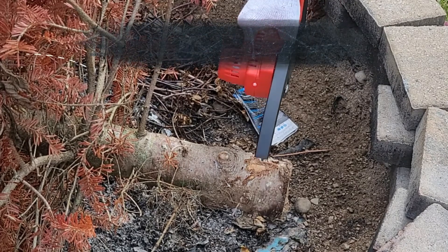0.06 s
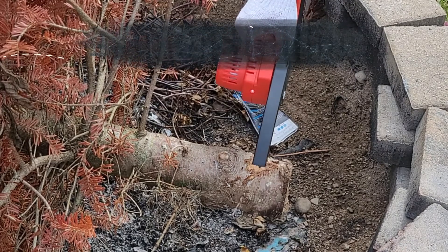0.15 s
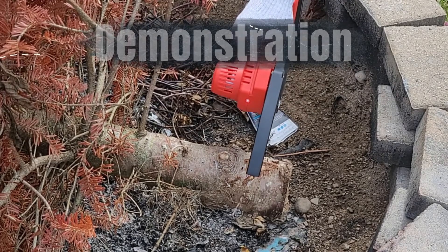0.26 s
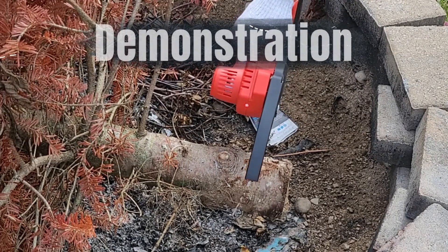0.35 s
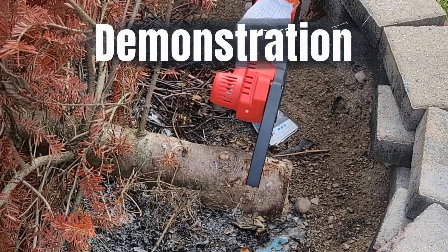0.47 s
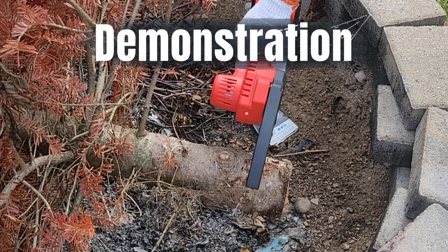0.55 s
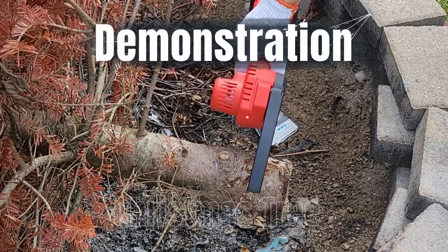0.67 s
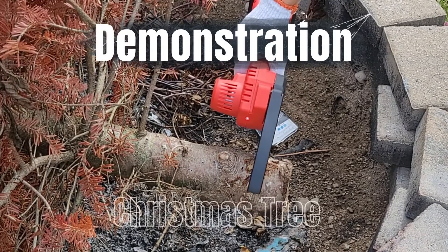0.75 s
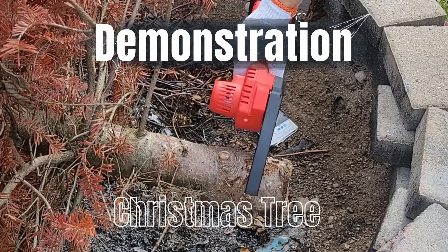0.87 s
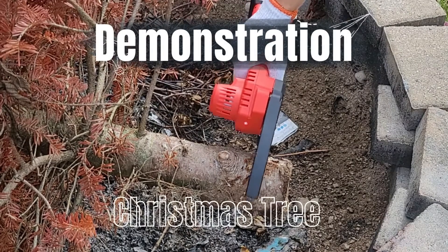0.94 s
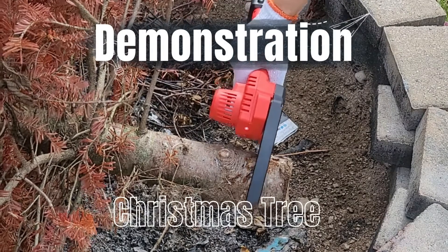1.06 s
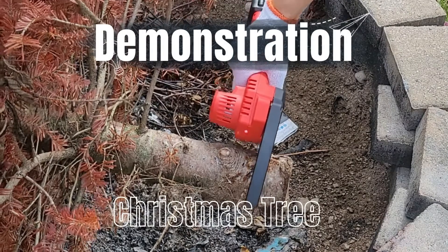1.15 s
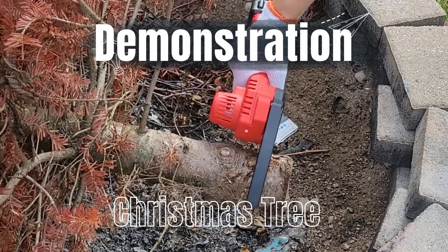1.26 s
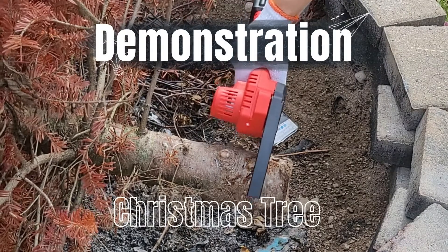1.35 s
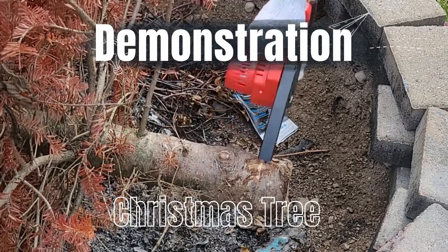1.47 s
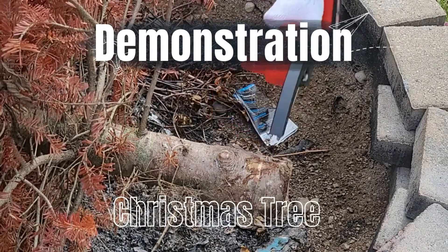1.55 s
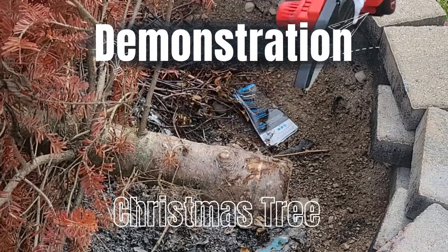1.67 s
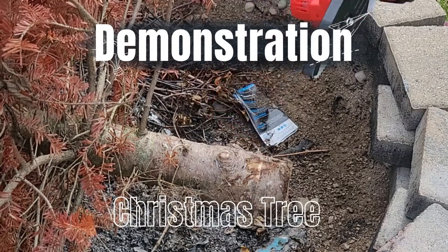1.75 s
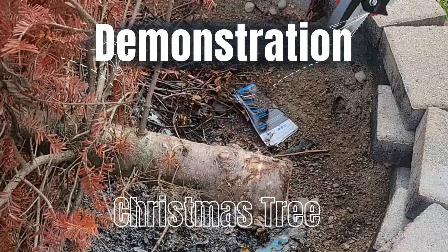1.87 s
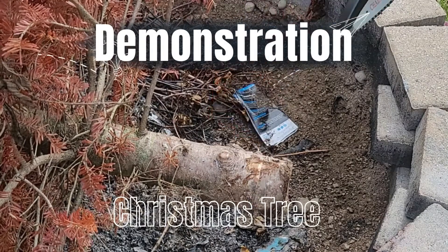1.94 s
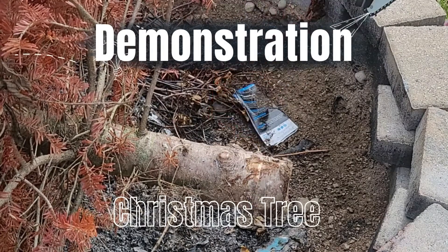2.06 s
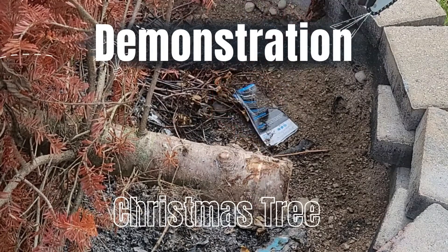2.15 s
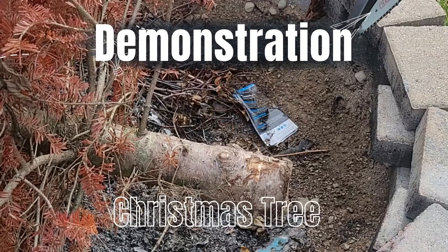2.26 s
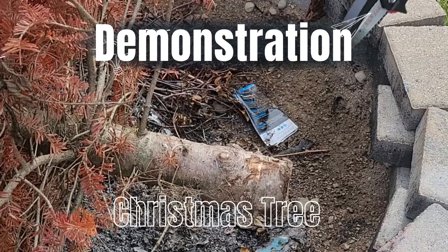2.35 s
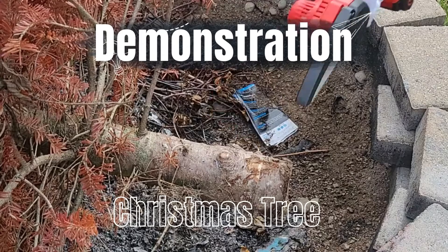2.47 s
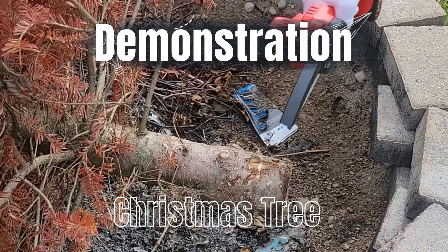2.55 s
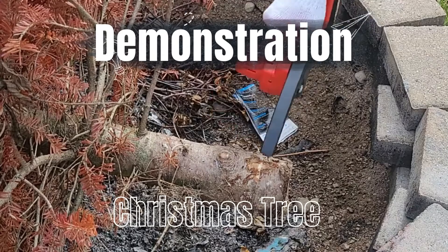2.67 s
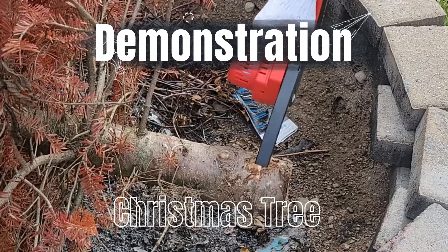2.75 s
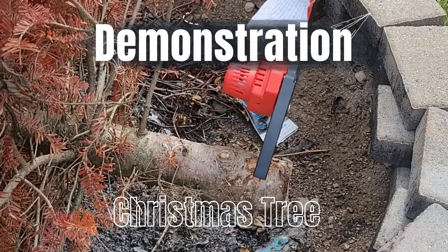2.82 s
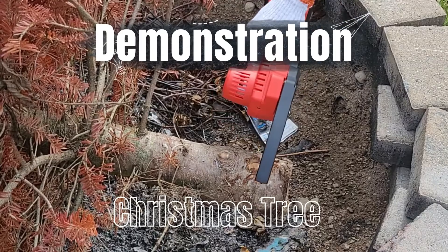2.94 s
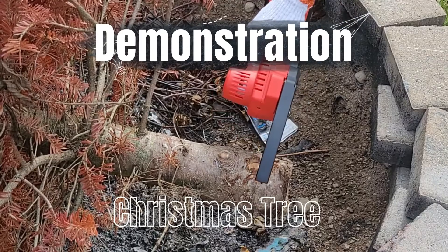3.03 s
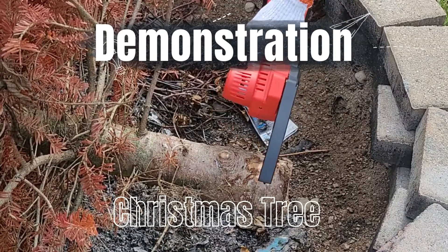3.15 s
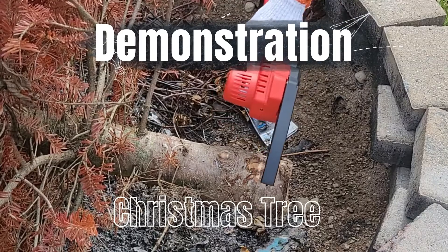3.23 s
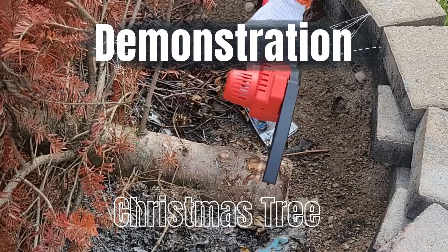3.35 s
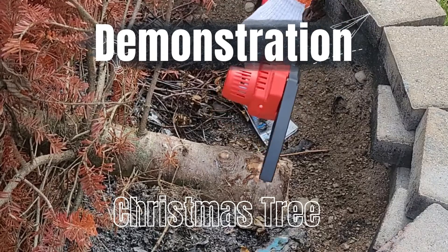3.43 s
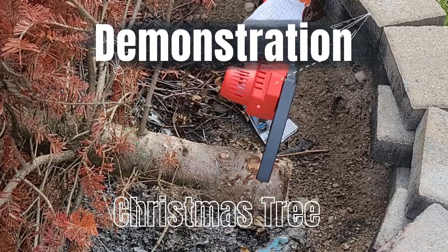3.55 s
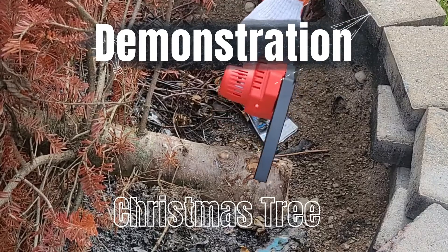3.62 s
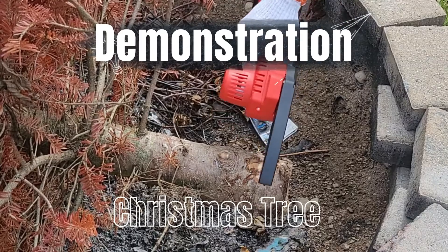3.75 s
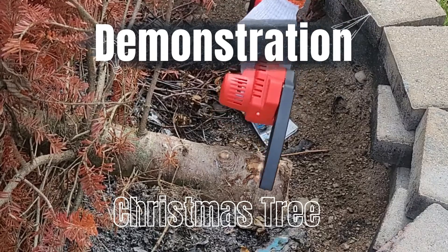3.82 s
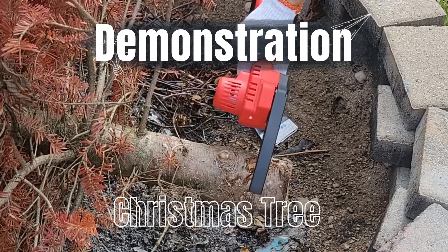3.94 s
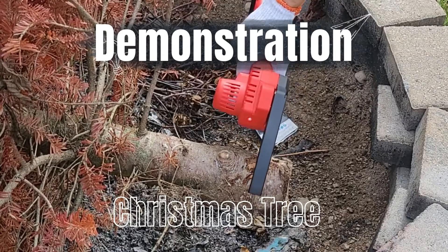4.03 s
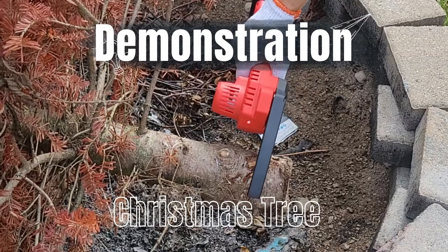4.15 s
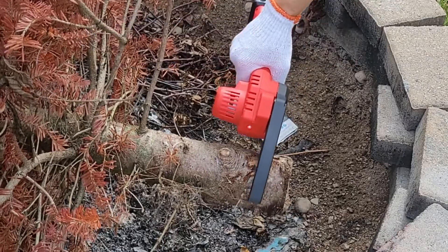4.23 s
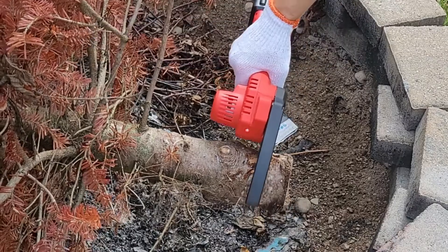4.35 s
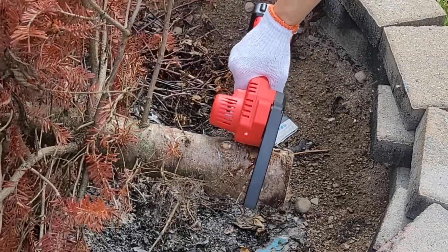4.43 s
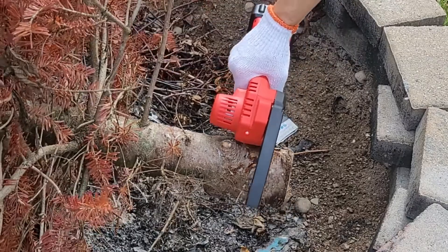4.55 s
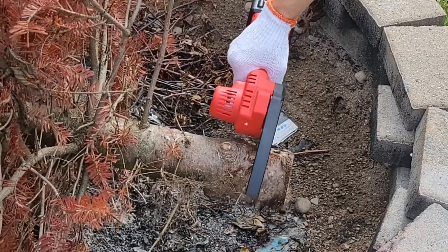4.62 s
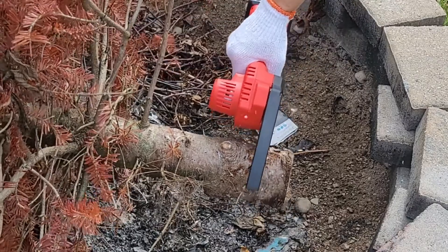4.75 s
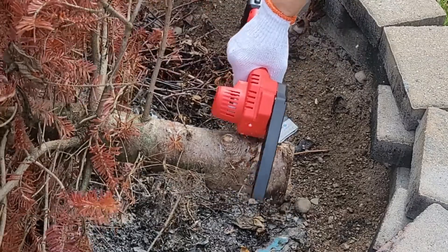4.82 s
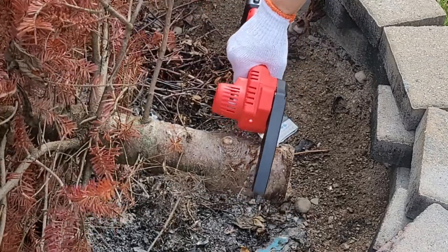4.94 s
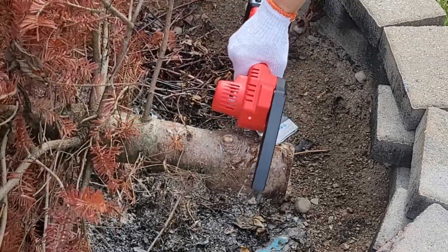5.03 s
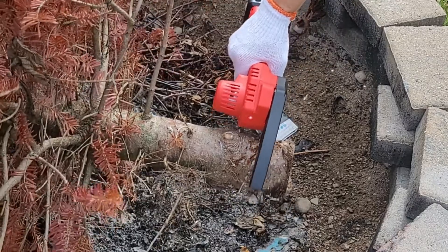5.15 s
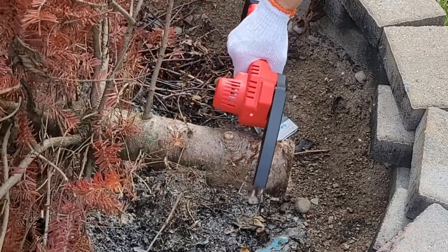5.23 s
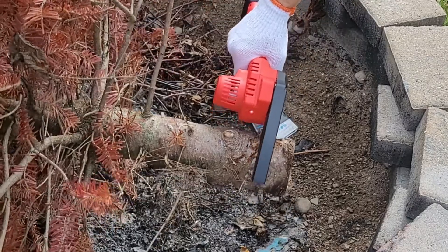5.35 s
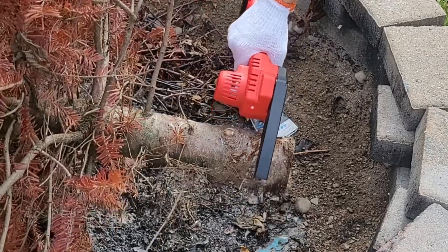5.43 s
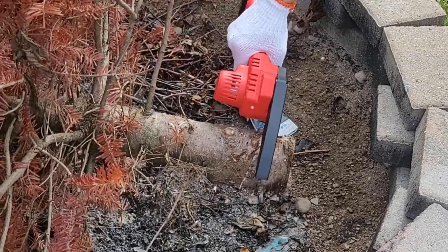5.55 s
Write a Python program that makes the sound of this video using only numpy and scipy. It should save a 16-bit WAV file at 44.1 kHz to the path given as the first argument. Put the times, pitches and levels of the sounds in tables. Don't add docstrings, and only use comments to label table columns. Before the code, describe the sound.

A loud, bright handheld chainsaw buzzes at full speed, dips slightly as it touches wood, then winds down in a fraction of a second. A soft garden pause reveals birds to the left, a high cricket to the right, low wind and small dry cracks. The motor snaps back on, then labours roughly through wood. Close, wide stereo pickup with only faint outdoor echo.

```python
import sys
import numpy as np
from scipy import signal
from scipy.fft import rfft, irfft
from scipy.io import wavfile

SR = 44100
rng = np.random.default_rng(int(sys.argv[2]) if len(sys.argv) > 2 else 0)


def field_ratio(decibels):
    return 10 ** (np.asarray(decibels, dtype=float) / 20)


def output_pcm(signal):
    pcm = np.clip(np.atleast_2d(signal).T, -1, 1) * 32767
    wavfile.write(sys.argv[1], SR, np.round(pcm).astype(np.int16))


N = 246519
T = np.arange(N) / SR
HZ = np.maximum(np.arange(N // 2 + 1) * SR / N, 1)
RELEASE_S, PRESS_S = 1.412, 3.572
STALL_HZ, FULL_HZ = 30, 454
# [pitch_hz, likeness_0_to_1]
CLOSE_LIKENESS = [(60, 0.79), (120, 0.93), (240, 0.53), (480, 1), (950, 0.94), (1890, 0.76), (3770, 0.91),
                  (7520, 0.38), (15000, 0.74)]


def rms_one(x):
    return x / np.sqrt(np.mean(x ** 2) + 1e-20)


def at_hz(points):
    hz, value = np.array(points)[:, 0], np.array(points)[:, 1]
    return np.interp(np.log(HZ), np.log(hz), value)


def drift(rate_hz):
    r = np.exp(-80 * np.pi * rate_hz / SR)
    noise = rng.standard_normal(N // 40 + 2002)
    slow = signal.lfilter([1], [1, -2 * r, r * r], noise)[2000:]
    return np.interp(np.arange(N) / 40, np.arange(len(slow)), rms_one(slow))


def ring(clicks, hz, t60_s):
    r, w = field_ratio(-60 / (t60_s * SR)), 2 * np.pi * hz / SR
    return signal.lfilter([0, np.sin(w)], [1, -2 * r * np.cos(w), r * r], clicks + 1e-18)


def body(modes, steep):
    power = 0
    for hz, width_hz, db in modes:
        off_center = (HZ - hz * hz / HZ) / width_hz
        power = power + field_ratio(2 * db) / (1 + off_center ** 2) ** steep
    return np.sqrt(power)


def two_ears(mid, side, gain, likeness, lean_db):
    alike = np.clip(at_hz(likeness), 0, 1)
    m = np.sqrt(1 + alike) * rfft(mid)
    s = np.sqrt(1 - alike) * rfft(side)
    ears = np.array([(m + s) * field_ratio(lean_db / 2), (m - s) * field_ratio(-lean_db / 2)])
    return rms_one(irfft(gain * ears, N))


def bandpass(x, low_hz, high_hz):
    return signal.sosfilt(signal.butter(3, [low_hz, high_hz], "band", fs=SR, output="sos"), x)


def highpass(x, hz):
    return signal.sosfilt(signal.butter(4, hz, "high", fs=SR, output="sos"), x)


def garden_air():
    # [pitch_hz, level_db_per_hz]
    air = [(15, -34.5), (25, -9.5), (59, 0.5), (91, -2.5), (136, -8), (178, -21), (260, -20.5), (1050, -35),
           (2770, -30), (4040, -31), (6730, -45), (7910, -49), (9300, -39), (15500, -50)]
    # [pitch_hz, likeness]
    air_likeness = [(60, 0.91), (240, 0.85), (950, 0.34), (3770, -0.04), (15000, 0.11)]
    # [center_s, half_length_s, rise_over_wind_db]
    gusts = [(0, 0.027, 6), (0.287, .06, 7), (.62, .08, 0), (1.28, .07, 3), (2.24, .07, 5), (2.6, .6, 4.5),
             (3.1, 0.092, 5), (3.42, .06, 4), (4.31, .07, 3), (4.57, 0.088, 7), (4.8, .15, 3)]
    # [center_s, half_length_s, level_db]
    rustles = [
        (1.83, .008, -76),
        (2.29, .08, -74),
        (2.42, .015, -72),
        (2.49, .08, -77),
        (2.55, .02, -74),
        (3.46, .03, -82),
        (3.585, .02, -79),
    ]
    gain = field_ratio(at_hz(air))
    wash = two_ears(*rng.standard_normal((2, N)), gain * (HZ > 140), air_likeness, 0)
    wind = two_ears(*rng.standard_normal((2, N)), gain * (HZ <= 140), air_likeness, 0)
    grains = (rng.random((2, N)) < 6000 / SR) * rng.standard_normal((2, N))
    needles = two_ears(*grains, body([(9200, 2500, 0.0052), (12420, 3500, 0)], 1.5), CLOSE_LIKENESS, 0)
    stir = sum(field_ratio(db - 17 * ((T - s) / half) ** 2) for s, half, db in rustles)
    gusts_db = sum(db * np.exp(-((T - s) / half) ** 2) for s, half, db in gusts)
    wash_db = -64 + 3 * np.minimum(stir / field_ratio(-72), 1) + 1.3 * drift(8)
    out = field_ratio(wash_db) * wash
    out = out + field_ratio(5 + 2 * drift(60)) * stir * needles
    far_birds = body([(2698, 200, 1), (3200, 250, -2), (4000, 400, -3.5)], 2)
    chatter = two_ears(*rng.standard_normal((2, N)), far_birds, air_likeness, 0)
    out = out + field_ratio(-75 + 4 * drift(6)) * chatter
    return out + field_ratio(-59 + gusts_db + 0.7 * drift(5)) * wind


def birds():
    # [start_s, length_s, start_hz, end_hz, level_db]
    glides = [(2.01, .087, 1900, 2130, -58.5), (2.443, .018, 3770, 4900, -61.5),
              (2.378, .02, 5300, 4600, -63), (2.766, .06, 2050, 3500, -57), (2.82, .028, 3500, 4300, -50.5),
              (2.838, .034, 1780, 2200, -57), (2.85, .04, 2600, 3200, -63), (2.872, .018, 5400, 3600, -54),
              (2.885, .035, 3780, 4400, -60), (2.888, .015, 2600, 3000, -60),
              (2.938, .035, 1750, 2100, -70), (2.945, .014, 3600, 2600, -63),
              (2.93, .025, 4100, 4400, -64.5), (3.003, .023, 3480, 4150, -65),
              (3.026, .023, 4150, 3600, -66), (3.135, .037, 3300, 4300, -68), (3.165, .04, 2180, 2500, -64),
              (3.205, .03, 2500, 1750, -63), (3.19, .012, 4800, 3600, -65), (3.273, .022, 2530, 1600, -66),
              (3.449, .025, 2600, 2900, -65), (3.451, .013, 4000, 5000, -65), (3.472, .02, 5100, 4300, -59),
              (3.497, .058, 2700, 4900, -61)]
    # [start_s, length_s, pitch_hz, level_db]
    whistles = [(1.75, .04, 2000, -66), (2.094, .13, 2680, -70), (2.054, .075, 3200, -73),
                (2.54, .16, 5720, -66), (2.69, .05, 4800, -72), (3.2, .11, 2850, -75),
                (2.63, .12, 2500, -70.5), (2.607, .05, 9250, -71), (2.797, .06, 9200, -71.5),
                (2.988, .036, 9300, -73.5), (2.73, .1, 1810, -70), (2.78, .04, 3900, -66),
                (3.544, .04, 9200, -78), (3.554, .046, 2520, -65), (2.28, .08, 4250, -76),
                (3.106, .06, 2220, -74)]
    out, waver_db, wobble = np.zeros(N), 3 * drift(120), drift(150)
    notes = [(*row, 0) for row in glides]
    notes = notes + [(s, length, hz, hz, db, 0.023) for s, length, hz, db in whistles]
    for s, length, start_hz, end_hz, db, arch in notes:
        u = np.linspace(0, 1, round(length * SR))
        swell = np.sin(np.pi * u) ** .6
        at = slice(round(s * SR), round(s * SR) + len(u))
        ratio = end_hz / start_hz
        pitch_hz = start_hz * ratio ** u ** 1.3 * (1 + arch * swell)
        pitch_hz = pitch_hz + 30 * wobble[at] * abs(ratio - .8)
        out[at] += field_ratio(db + 1 + waver_db[at]) * swell * np.sin(2 * np.pi * np.cumsum(pitch_hz) / SR)
    tail = rng.standard_normal((2, 6000)) * np.exp(-np.arange(6000) / (0.027 * SR))
    echo = signal.fftconvolve(out[None], tail)[:, :N]
    return out * field_ratio(np.array([[1.0], [-1.0]])) + field_ratio(-29) * echo


def cricket():
    # [start_s, peak_db]
    chirps = [
        (1.7564, -53),
        (1.8972, -59),
        (2.0394, -60),
        (2.196, -58),
        (2.4374, -52),
        (2.5842, -49),
        (3.015, -51),
        (3.1557, -57.5),
        (3.293, -57),
        (3.446, -55.5),
    ]
    out, t = np.zeros(N), np.arange(round(0.0053 * SR)) / SR
    for s, db in chirps:
        for k in range(4):
            tone = np.sin(2 * np.pi * (9350 + 60 * k + 53000.0 * t) * t)
            stroke = np.sin(np.pi * t / t[-1]) * tone
            stroke_db = db - 4.5 + .9 * k + rng.normal(0, 2.5)
            out[round((s + .0066 * k) * SR):][:len(t)] += field_ratio(stroke_db) * stroke
    return out * field_ratio(np.array([[-1.5], [1.5]]))


def snaps():
    # [start_s, peak_db, pitch_hz, bright_part_db, thud_db]
    snap_table = [
        (2.251, -44.5, 603, -70.5, -61),
        (2.31, -47.5, 1430, -59, -69),
        (2.386, -41, 1800, -53, -59),
        (2.41, -50, 2850, -40, -61),
        (2.494, -54, 1330, -60.5, -65),
        (2.539, -65, 2860, -47, -69),
        (2.734, -55.5, 542, -63.5, -68),
        (3.11, -36.5, 1120, -65, -51),
    ]
    out, fade = np.zeros(N), np.exp(-np.arange(2000) / (0.0028 * SR))
    for s, db, hz, bright_db, thud_db in snap_table:
        burst = (rng.standard_normal(2000) + 3 * (fade == 1)) * fade
        bands = [(hz * .72, hz * 1.25, db - 3), (900, 6000, bright_db - 1),
                 (6000, 14000, bright_db + 4), (290, 410, thud_db + 4)]
        for low_hz, high_hz, peak_db in bands:
            part = bandpass(burst, low_hz, high_hz)
            out[round(s * SR):][:2000] += field_ratio(peak_db - 2.0) * part / np.abs(part).max()
    return out


def knocks():
    # [start_s, peak_db]
    catches = [(1.056, -41.5), (1.255, -32), (4.348, -28), (4.479, -30), (4.547, -20), (4.586, -24),
               (4.635, -29), (4.83, -26.5), (5.069, -23.5), (5.127, -25), (5.219, -25), (5.325, -27),
               (5.382, -34), (5.53, -23.5)]
    # [from_s, to_s]
    cuts = [
        (1.15, 1.42),
        (4.3, 5.57),
    ]
    blows = np.zeros(N + 600)
    jolts = []
    for a, b in cuts:
        for u, v in rng.random((round(22 * (b - a)), 2)):
            jolts.append((a + (b - a) * u, -35 + 6 * v))
    for s, db in catches + jolts:
        blows[round(s * SR):][:600] += field_ratio(db - 31.5) * rng.standard_normal(600) * np.hanning(600)
    trunk = .4 * ring(blows, 160, .04) + ring(blows, 270, .03)
    trunk = trunk + 1.5 * ring(blows, 400, .04) + 1.5 * ring(blows, 650, .03)
    return highpass(trunk[:N], 120)


def shaft_speed(held_hz):
    coast = held_hz - 1180 * np.maximum(T - RELEASE_S, 0)
    spin_up = held_hz * (1 - np.exp(-np.maximum(T - PRESS_S, 0) / .053))
    return np.maximum(np.where(T < PRESS_S, coast, spin_up), 1)


def motor(shaft, phase, slack_db):
    # [shaft_hz, level_db]
    first_order = [(200, -74), (272, -62.5), (331, -43), (384, -32), (420, -31.5), (440, -27.5),
                   (455, -25.5)]
    second_order = [(150, -60), (205, -41), (300, -34), (385, -32), (420, -49), (437, -38), (447, -28),
                    (456, -26)]
    # [multiple_of_shaft, level_under_order_1_db]
    faint_orders = [(6 / 7, -17), (8 / 7, -20), (1.25, -15), (2.25, -12), (4, -17)]
    sag = np.clip(1 - shaft / FULL_HZ, 0, .08)
    first_db = np.interp(shaft, *np.transpose(first_order), left=-120) + slack_db
    second_db = np.interp(shaft, *np.transpose(second_order), left=-120) + slack_db
    phase = phase(sag)
    tones = field_ratio(first_db + (0.68 + 25 * sag) * drift(30)) * np.sin(phase)
    for k, db in faint_orders:
        tones = tones + field_ratio(first_db + db + 3.1 * drift(33)) * np.sin(k * phase + .5 * drift(27))
    third_db = first_db - 9 + 52 * sag + 3.0 * drift(25)
    tones = tones + field_ratio(third_db) * np.sin(3 * phase + 0.62 * drift(14))
    ears = np.array([[-1], [1]])
    octave_db = second_db - 1.0 + (1.0 + 45 * sag) * drift(38) + 1.5 * ears
    octave = field_ratio(octave_db) * np.sin(2 * phase + 0.31 * ears)
    return np.sqrt(2) * (tones + octave)


def rattle(modes, speed, turn, per_s, spread_db, wobble, beat, steep):
    # [pitch_hz, lean_db]
    lean = [(60, -1), (95, -1), (150, -1), (240, 1), (380, -1), (600, 1.5), (950, -1.5), (1500, 0.5),
            (2380, -1.5), (3770, -0.5), (5980, -7), (9470, -2.5), (15000, 6)]
    hit = rng.random((2, N)) < per_s * (.15 + speed) / SR
    strength = field_ratio(spread_db * np.minimum(rng.exponential(1, (2, N)), 5))
    clicks = hit * strength * rng.choice([-1, 1], (2, N)) / np.sqrt(0.12 + speed)
    throb = 1 + wobble * np.cos(turn) + beat * np.cos(1.75 * turn)
    throb = throb + 0.02 * np.cos(turn / 2)
    return throb * two_ears(*clicks, body(modes, steep), CLOSE_LIKENESS, at_hz(lean))


def saw():
    # [time_s, shaft_speed_hz, bar_turned_to_ears_db]
    hand = [(0, 452.4, 1.5), (.2, 452.8, 1.5), (.8, 455.8, -1.5), (1.1, 452.8, -0.5), (1.2, 437.8, 0.5),
            (1.3, 436.4, 1), (1.4, 441.2, 0.5), (3.86, 457.2, 0.5), (4.19, 452.3, -1), (4.32, 445.7, 0.5),
            (4.5, 429.8, 0), (4.65, 425.2, 0), (4.75, 433.4, -0.5), (4.94, 417, -1), (5.06, 429.4, 0),
            (5.3, 419, 0), (5.5, 404, 0.5), (5.59, 423, 0)]
    # [pitch_hz, width_hz, level_db]
    housing_modes = [(416, 240, -1.5), (527, 97, 2), (834, 220, 0), (1100, 160, -2.5), (1250, 338, 5.5)]
    bar_modes = [(2083, 340, -3.5), (2255, 39, 2), (2469, 230, 0), (2626, 110, 1.5), (2796, 250, -2.5),
                 (3140, 220, -9.5), (3420, 940, -6), (3813, 320, -6.5), (4070, 320, -8), (4850, 1200, -14)]
    link_modes = [(6400, 900, -34), (8000, 1400, -8.5), (9180, 750, 2.5), (9740, 890, -0.5),
                  (10780, 1300, 2.5), (12280, 610, 1), (13000, 1120, -6.5), (15000, 1800, -8)]
    wood_modes = [(200, 110, -20.5), (750, 650, -0.5), (1264, 250, -9.5), (1670, 690, 2), (5120, 700, -2.5),
                  (7360, 1100, -2.5)]
    # [full_speed_db, share_of_speed_swing, gain_at_full_load_db]
    housing_rule = (-31.5, 0.67, 4.37)
    bar_rule = (-20.5, 0.92, 0.19)
    links_rule = (-11.5, 1.12, -0.24)
    bite_rule = (-34.5, 0.52, 7)
    s, held_hz, turned_db = np.transpose(hand)
    held, turned = np.interp(T, s, held_hz), np.interp(T, s, turned_db)
    shaft = shaft_speed(held)
    load = np.clip((FULL_HZ - held) / 36, 0, 1)
    before_press = T < PRESS_S
    swing_db = 20 * np.log10(np.clip((shaft - STALL_HZ) / (FULL_HZ - STALL_HZ), 0, 1) + 1e-9)
    swing_db = swing_db * np.where(before_press, 1, 0.28)
    engaged = np.where(before_press, 1, np.clip((T - PRESS_S - .021) / 0.034, 0, 1))
    slack_db = 20 * np.log10(engaged ** 1.3 + 1e-6)
    slack_db = slack_db - 450 * np.maximum(T - 1.685, 0) * before_press

    def level_db(rule):
        db, share, load_db = rule
        return db + share * swing_db + load_db * load + slack_db

    hunting = drift(25)
    sag = np.clip(1 - shaft / FULL_HZ, 0, .08)
    phase = 2 * np.pi * np.cumsum(shaft * (1 + (.002 + .07 * sag) * hunting)) / SR
    speed = np.clip(shaft / FULL_HZ, 0, 1)
    turn = phase / 7 + 0.76 * drift(4.6)
    shake = 0.58 * drift(8.9)
    out = motor(shaft, lambda sag: phase, slack_db)
    housing_db = level_db(housing_rule) + 2.0 + shake + .8 * drift(11)
    out = out + field_ratio(housing_db) * rattle(housing_modes, speed, turn, 2500, 2.5, 0.19, 0.14, 2.0)
    ridge, flanks = bar_modes[2:5], bar_modes[:2] + bar_modes[5:]
    for modes, share_db, facing in (ridge, -3.0, .4), (flanks, -2.5, 1.5):
        bar_db = level_db(bar_rule) + share_db + facing * turned + shake + 1.2 * drift(45)
        out = out + field_ratio(bar_db) * rattle(modes, speed, turn, 2500, 1.5, 0.034, .12, 1.56)
    for modes, share_db in (link_modes[:4], -4.5), (link_modes[4:], -1.8):
        links_db = level_db(links_rule) + share_db + shake + 1.1 * drift(4.6)
        out = out + field_ratio(links_db) * rattle(modes, speed, turn, 12000, 2.8, 0.093, 0.064, 1.19)
    out = highpass(out, 290)
    bite_db = level_db(bite_rule) + 1.5 * drift(18)
    out = out + field_ratio(bite_db) * rattle(wood_modes, speed, turn, 2000, 3.5, 0.18, .12, 1.6)
    return out * field_ratio(np.array([[-1], [1]]) * (0.04 - .3 * turned))


def garden_echo(x):
    t = np.arange(SR // 2) / SR
    tail = rng.standard_normal((2, len(t))) * field_ratio(-60 * t / .4) * (t > .02)
    tail = tail / np.sqrt(np.sum(tail ** 2) / 2)
    return field_ratio(-33) * signal.fftconvolve(x, tail, axes=1)[:, :N]


def scene():
    garden = garden_air() + birds() + cricket() + snaps()
    close = saw()
    return garden + knocks() + close + garden_echo(close)


def band_limit(x):
    return signal.sosfilt(signal.butter(12, 15850, fs=SR, output="sos"), x)


def record(dry):
    x = signal.sosfilt(signal.cheby2(12, 60, 16300, fs=SR, output="sos"), dry)
    x = x / (1 + np.abs(x / .96) ** 6) ** (1 / 6)
    return band_limit(x)


dry = scene()
out = record(dry)
output_pcm(out)
```